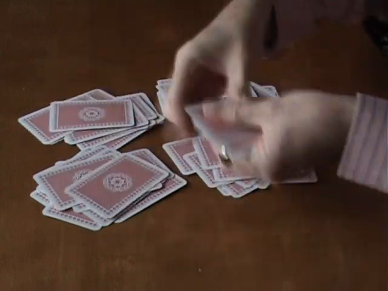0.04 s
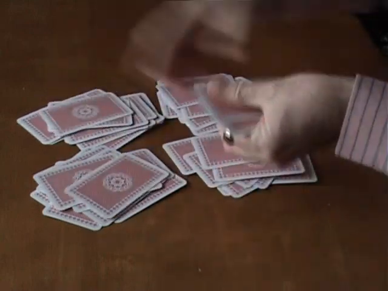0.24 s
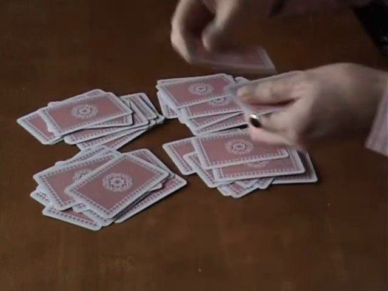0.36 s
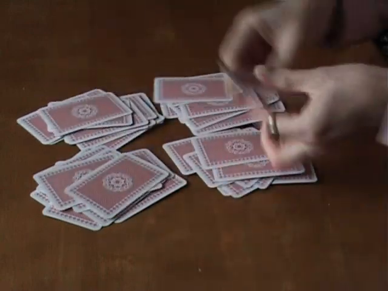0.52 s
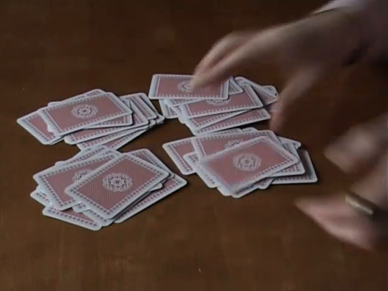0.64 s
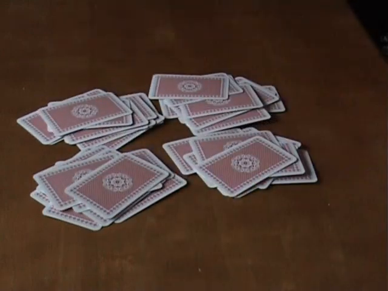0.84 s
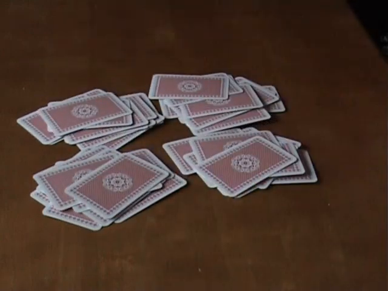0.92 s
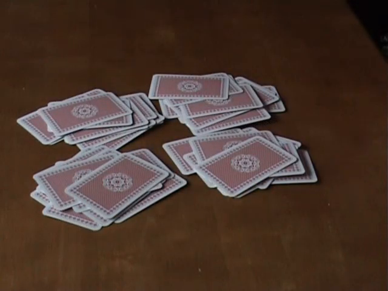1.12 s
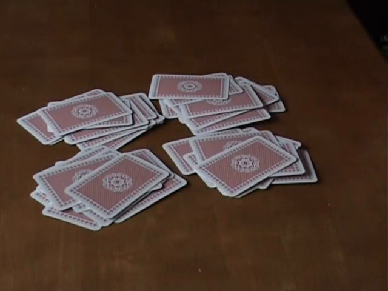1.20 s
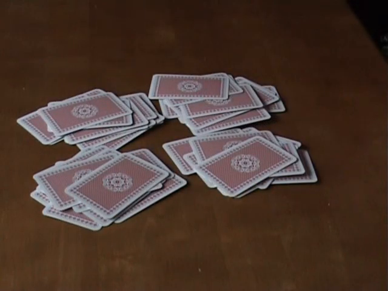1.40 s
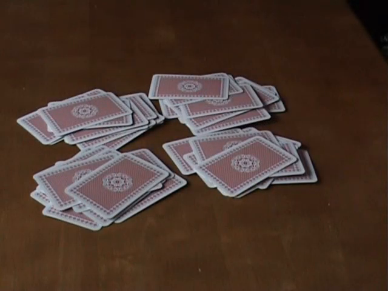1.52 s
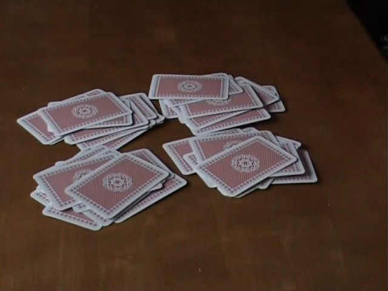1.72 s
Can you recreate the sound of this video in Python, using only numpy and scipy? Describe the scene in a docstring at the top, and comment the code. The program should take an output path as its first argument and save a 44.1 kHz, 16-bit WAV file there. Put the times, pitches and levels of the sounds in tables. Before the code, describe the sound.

Quick snaps and light clicks of playing cards dealt onto a wooden table.

```python
"""Dealing cards on a wooden table

The last playing cards are dealt onto piles, close by. Friction hisses as a card is rubbed off the pack;
bent, it snaps free of the thumb and rings in damped modes. Stiff edges click on the piles and the table
knocks softly. A small quiet room reflects these sounds, over a steady hiss, a faint hum, two low swells,
a few faint chirps and the whirr of a small motor."""
import sys
import numpy as np
from scipy import signal
from scipy.fft import rfft, irfft, next_fast_len
from scipy.io import wavfile
from scipy.ndimage import map_coordinates

SR = 44100
rng = np.random.default_rng(int(sys.argv[2]) if len(sys.argv) > 2 else 0)


def dump_mix(stems):
    """Bounce the given channels to the path in sys.argv[1] as a 16-bit WAV at rate SR."""
    frames = np.atleast_2d(stems).T  # one column per channel
    limited = np.clip(frames, -1, 1)  # hard clip at full scale
    pcm = np.round(limited * 32767).astype(np.int16)
    wavfile.write(sys.argv[1], SR, pcm)


N = 77175

# A bent card springs free: (time [s], level [dB], low mode [Hz], low mode relative level [dB],
# high mode [Hz], high mode t60 [s], edge crack relative level [dB])
SNAPS = [(0.248, 11.5, 755, -7, 2270, 0.0019, -12), (0.4975, 10, 1150, -4.5, 2990, 0.0048, -25.5)]
# Spectrum of the edge's crack in a snap: (frequency [Hz], gain [dB])
CRACK_SPECTRUM = [(300, -39), (700, -12), (2000, -22.5), (4300, 3.5), (6000, 2.5), (7800, -6.5),
                  (10000, -29), (14000, -27)]
# An edge strikes the pack or a pile: (time [s], level [dB], body shelf [dB], treble shelf [dB],
# clatter t60 [s], first contact against clatter [dB], modes as (frequency [Hz], relative level [dB]))
CLICKS = [(0.11, -12, -12, 0, 0.011, 3, []), (.1130, -17, -1, -3, 0.0074, -7, []),
          (0.191, -19.5, 2, 0, 0.013, -1, [(6100, -8)]), (0.3302, -15.5, 5, 3, 0.01, -18, []),
          (0.3471, -11.5, -11, 5.5, 0.0028, 15, [(3600, -10)]),
          (0.3501, -10, -23, -7, 0.0046, -7, [(6350, -6)]), (0.4294, -12.5, 2, 0, 0.003, -11, [(2110, 0)]),
          (0.4352, -11.5, 6.5, 5.5, 0.0053, 1.5, [(2030, -2.5)]),
          (0.5732, -3.5, -13.5, 6, 0.0046, -6, [(2550, -6.5), (5280, -1.5), (8500, -6)]),
          (0.582, -12, -13, 6, 0.013, -16, [(8300, -8)]), (0.65, -8.5, 7, -3, 0.0083, -11, [(2780, -7),
          (3600, -9), (6750, -9.5), (9750, -14)]), (0.7669, -18, -1, 8, 0.01, -9, [(2980, -5)]),
          (1.326, -26, -6, -11, 0.0043, -11, [(3700, 4)])]
# Spectrum of a struck edge: (frequency [Hz], gain [dB])
EDGE_SPECTRUM = [(100, -34), (350, -7.5), (900, 6), (1600, -7), (2200, -2.5), (2900, 2.5), (4300, -4),
                 (5500, -0.5), (9500, -1.5), (12000, -16.5), (15000, -25)]
# Card rubs on card:
# (start [s], duration [s], start level [dB], end level [dB], body shelf [dB], treble shelf [dB])
SLIDES = [(0, 0.0066, -35, -46, -14, -8), (0.013, 0.018, -50.5, -47, -21, -1),
          (0.192, 0.038, -44.5, -41, 1.5, 3), (0.232, 0.016, -43, -37, -14, -0.5),
          (0.319, 0.037, -44, -45, 4, 8), (0.427, 0.026, -41, -47, -1, 4.5),
          (0.442, 0.06, -47, -44, -7, -1), (0.495, 0.0021, -42, -36, 0, -16),
          (0.549, 0.015, -42, -46.5, 1, 2), (0.567, 0.026, -43.5, -45.5, -10, -4)]
# Friction noise: (frequency [Hz], relative spectral density [dB])
FRICTION_SPECTRUM = [(100, -15), (400, -0.5), (660, 2.5), (1050, 2.5), (2200, 2), (4200, -6.5),
                     (6200, -5.5), (10000, -9.5), (12500, -19.5), (15000, -29)]
# Hand and card knock the table through the pile: (time [s], level [dB], frequency [Hz], t60 [s])
KNOCKS = [(.111, -39, 297, 0.048), (0.2005, -32, 440, 0.045), (.205, -33.5, 840, 0.029),
          (.199, -34, 1080, .025), (.327, -41, 615, 0.05), (.305, -47, 350, 0.05), (.338, -46, 342, 0.05),
          (.4975, -35, 510, .035), (.571, -39, 270, 0.024), (.576, -36, 465, 0.023), (.651, -38, 575, 0.05),
          (.6505, -32, 921, 0.042), (0.6495, -33, 1200, 0.014)]
# Reflections from near surfaces: (delay [s], level [dB])
REFLECTIONS = [(.0012, -12.5), (.0056, -15.5), (0.013, -24), (0.015, -18.5), (0.0196, -19)]
# Reverberation time of the room: (frequency [Hz], t60 [s])
ROOM_T60 = [(200, 0.48), (2000, 0.14), (10000, 0.28)]
# Steady hiss: (frequency [Hz], relative spectral density [dB])
HISS_SPECTRUM = [(15, -13), (28, -12.5), (90, -8), (180, -5.5), (225, -7.5), (310, -2.5), (420, -11.5),
                 (740, -10.5), (900, -8), (1250, -11.5), (2000, -11), (2600, -14.5), (3600, -16),
                 (4700, -21), (7400, -19.5), (8800, -27), (10700, -22.5), (15000, -54)]
# Likeness of the room's noise at the two ears: (frequency [Hz], correlation [-1 to 1])
EAR_CORRELATION = [(35, 0.78), (70, 0.42), (170, 0.48), (370, 0), (1000, 0), (2400, 0.14), (6000, 0.0064),
                   (14000, 0)]
# Noise bands of the room's drone: (centre [Hz], width [Hz], level [dB])
DRONE_BANDS = [(273, 42, -69), (1005, 120, -62.5)]
# Steady tones of the room: (frequency [Hz], level [dB])
HUM_TONES = [(188.4, -72), (812.9, -66)]
# Low Gaussian swells: (peak time [s], standard deviation [s], centre [Hz], width [Hz], level [dB])
RUMBLES = [(0.062, .1, 40, 15, -60), (1.675, 0.14, 169, 62, -56.5)]
# The motor's noise: (frequency [Hz], relative spectral density [dB])
MOTOR_SPECTRUM = [(2000, -12), (3000, -5.5), (3700, 2), (4700, -4.5), (5500, 1), (6700, -5.5), (8500, -17),
                  (12000, -21)]
# Faint background chirps: (peak time [s], level [dB])
CHIRPS = [(.746, -52), (1.001, -52.5), (1.09, -55), (1.155, -51), (1.17, -51.5), (1.232, -52),
          (1.373, -52.5)]


def card_snaps():
    """Free vibration: a bent card, suddenly released, cracks and rings in three heavily damped modes."""
    low_mid_t60_s, mid_hz, mid_db = 0.0057, 1920, -11
    radiation = signal.butter(2, [610, 4600], "band", fs=SR, output="sos")  # band the card radiates [Hz]
    out, t = np.zeros(N), np.arange(SR // 20) / SR

    def mode(hz, t60):
        """Impulse response of a damped oscillator, with a gain near 1 at resonance."""
        return 2 * np.log(1000) / (t60 * SR) * decay(t, t60) * np.cos(2 * np.pi * hz * t)

    for time, db, low_hz, low_db, high_hz, high_t60, crack_db in SNAPS:
        ring = mode(high_hz, high_t60)
        ring += amp(mid_db) * mode(mid_hz, low_mid_t60_s)
        ring += amp(low_db) * mode(low_hz, low_mid_t60_s)
        add(out, time, amp(db) * signal.sosfilt(radiation, ring))
        crack = minimum_phase(lambda hz: amp(curve(CRACK_SPECTRUM, hz)))
        add(out, time, amp(db + crack_db) * crack)
    return out


def edge_clicks():
    """Impact excitation: a stiff edge strikes, clatters as it settles and may set card modes ringing."""
    ring_t60_s = 0.008
    out, t = np.zeros(N), np.arange(SR // 20) / SR
    for time, db, body_db, treble_db, clatter_t60, first_db, modes in CLICKS:
        contact = noise_burst(clatter_t60, rise_s=0.00031)
        contact[0] += amp(first_db)
        edge = minimum_phase(lambda hz: card_gain(EDGE_SPECTRUM, hz, body_db, treble_db))
        click = signal.fftconvolve(unit_energy(contact), edge)
        add(out, time, amp(db) * click)
        for ring_hz, ring_db in modes:
            ring = unit_energy(decay(t, ring_t60_s) * np.sin(2 * np.pi * ring_hz * t))
            add(out, time, amp(db + ring_db) * np.linalg.norm(click) * ring)
    return out


def card_slides():
    """Sliding friction: card on card gives smooth noise, with tiny impulses where the finish catches."""
    attack_s, release_s = 0.0063, 0.0054
    catches_per_s, catch_db = 1500, -0.5
    out, t = np.zeros(N), np.arange(N) / SR
    for start, duration, start_db, end_db, body_db, treble_db in SLIDES:
        end = start + duration
        catches = rng.standard_normal(N) * (rng.random(N) < catches_per_s / SR)
        friction = rng.standard_normal(N) + amp(catch_db) * unit_rms(catches)
        rub = filtered(friction, lambda hz: card_gain(FRICTION_SPECTRUM, hz, body_db, treble_db))
        attack = np.clip((t - start) / attack_s, 0, 1)
        release = np.exp(-np.maximum(t - end, 0) / release_s)
        level = amp(np.interp(t, [start, end], [start_db, end_db]))
        out += level * attack * release * unit_rms(rub)
    return out


def table_knocks():
    """Damped resonance: each soft blow through the pile leaves one short, low ring of the table."""
    attack_s = 0.0013
    out, t = np.zeros(N), np.arange(SR // 5) / SR
    attack = 1 - np.exp(-t / attack_s)
    for time, db, hz, t60 in KNOCKS:
        add(out, time, amp(db) * attack * decay(t, t60) * np.sin(2 * np.pi * hz * t))
    return out


def room_reverberation(direct):
    """Convolution with the room's response: blurred early reflections and a short tail for each ear."""
    blur_t60_s, early_cutoff_hz = 0.01, 3020
    tail_db, tail_cutoff_hz = -9.5, 6000
    band_hz, t, noise = signal.stft(rng.standard_normal((2, SR // 3)), SR, nperseg=256)
    _, tail = signal.istft(noise * decay(t, curve(ROOM_T60, band_hz)[:, None]), SR, nperseg=256)
    tail /= np.linalg.norm(tail[0])
    early = np.zeros((2, N))
    for delay, db in REFLECTIONS:
        shared = noise_burst(blur_t60_s)
        for ear in early:
            add(ear, delay, amp(db) * (shared + 0.5 * noise_burst(blur_t60_s)))
    response = filtered(early, lambda hz: 1 / np.hypot(1, hz / early_cutoff_hz))
    response += amp(tail_db) * filtered(tail, lambda hz: 1 / np.hypot(1, hz / tail_cutoff_hz))
    return signal.fftconvolve(direct[None], response, axes=1)[:, :N]


def room_ambience():
    """Superposition: broadband hiss, narrowband drone, a slightly wavering hum and two low swells."""
    hiss_db = -51.5
    waver_per_s, waver_db, drift_rad = 13.9, 0.6, 0.15
    t = np.arange(N) / SR
    out = amp(hiss_db) * stereo_noise(lambda hz: amp(curve(HISS_SPECTRUM, hz)))
    for hz, width, db in DRONE_BANDS:
        out += amp(db) * noise_band(hz, width)
    for hz, db in HUM_TONES:
        amplitude = np.sqrt(2) * amp(db + waver_db * wander(waver_per_s, points=200))
        phase = 2 * np.pi * hz * t + drift_rad * wander(waver_per_s, points=200)
        out += amplitude * np.sin(phase)
    for time, sigma_s, hz, width, db in RUMBLES:
        out += amp(db) * swell(time, sigma_s) * noise_band(hz, width)
    return out


def faint_chirps():
    """Random phase modulation roughens a tone that is heard only in brief, faint blips."""
    pitch_hz, sigma_s, roughness_rad = 2120, 0.0045, 0.8
    t = np.arange(N) / SR
    phase = 2 * np.pi * pitch_hz * t + roughness_rad * wander(per_s=400, points=N)
    envelope = sum(amp(db) * swell(time, sigma_s) for time, db in CHIRPS)
    return envelope * np.sin(phase)


def motor_whirr():
    """Amplitude modulation: a small motor gives one puff of noise per turn as its speed drifts."""
    level_db, turns_per_s, drift_fraction, puff_depth = -57.5, 301.7, 0.0216, 0.66
    speed = turns_per_s * (1 + drift_fraction * wander(per_s=10, points=40))
    turns = np.cumsum(speed) / SR
    puffs = rng.standard_normal(N) * np.exp(puff_depth * np.cos(2 * np.pi * turns))
    return amp(level_db) * unit_rms(filtered(puffs, lambda hz: amp(curve(MOTOR_SPECTRUM, hz))))


def card_gain(spectrum, hz, body_db, treble_db):
    """Shelving: a card's spectrum is raised or lowered in its body and in its treble."""
    body_hz, treble_hz = 1930, 7400
    body = 1 / (1 + (hz / body_hz) ** 4)
    treble = 1 - 1 / (1 + (hz / treble_hz) ** 4)
    return amp(curve(spectrum, hz) + body_db * body + treble_db * treble)


def stereo_noise(gain):
    """Partial coherence: the ratio of mid to side sets how alike the ears are in noise of rms 1."""
    def mid_side_gain(hz):
        angle = np.arccos(np.clip(curve(EAR_CORRELATION, hz), -1, 1)) / 2
        return gain(hz) * [np.cos(angle), np.sin(angle)]

    mid, side = filtered(rng.standard_normal((2, N)), mid_side_gain)
    return unit_rms(np.array([mid + side, mid - side]))


def noise_band(centre_hz, width_hz):
    """Band-pass filtering confines stereo noise to one narrow peak."""
    return stereo_noise(lambda hz: 1 / (1 + (2 * (hz - centre_hz) / width_hz) ** 2))


def noise_burst(t60, rise_s=1e-5):
    """Exponentially damped noise of energy 1."""
    t = np.arange(1024) / SR
    return unit_energy(rng.standard_normal(len(t)) * decay(t, t60) * (1 - np.exp(-t / rise_s)))


def wander(per_s, points):
    """Spline interpolation turns random points into a smooth fluctuation."""
    return map_coordinates(rng.standard_normal(points), [np.arange(N) / SR * per_s])


def swell(time, sigma_s):
    """Gaussian envelope with a peak of 1 at the given time."""
    return np.exp(-((np.arange(N) / SR - time) / sigma_s) ** 2 / 2)


def decay(t, t60):
    """Exponential damping: 60 dB in t60 seconds."""
    return amp(-60 * t / t60)


def minimum_phase(gain, size=2048):
    """Folding the cepstrum gives the most compact causal impulse response with this gain."""
    cepstrum = irfft(np.log(gain(np.fft.rfftfreq(size, 1 / SR)) + 1e-6))
    cepstrum[1:size // 2] *= 2
    cepstrum[size // 2 + 1:] = 0
    return irfft(np.exp(rfft(cepstrum)))


def filtered(x, response):
    """Linear filtering: the spectrum of x is multiplied by a frequency response."""
    size = next_fast_len(N + SR // 4)
    return irfft(rfft(x, size) * response(np.fft.rfftfreq(size, 1 / SR)), size)[..., :N]


def curve(points, hz):
    """Interpolation of (frequency [Hz], value) points on a logarithmic frequency axis."""
    frequencies, values = np.transpose(points)
    return np.interp(np.log(hz + 1), np.log(frequencies + 1), values)


def amp(db):
    """Amplitude ratio of a level in decibels."""
    return 10 ** (np.asarray(db) / 20)


def unit_rms(x):
    """Normalisation to rms 1."""
    return x / np.sqrt(np.mean(x ** 2) + 1e-20)


def unit_energy(x):
    """Normalisation to energy 1."""
    return x / np.linalg.norm(x)


def add(track, time, x):
    """Superposition of x on the track, from a time in seconds."""
    start = max(round(time * SR), 0)
    track[start:start + len(x)] += x[:N - start]


def pan(x, right_db):
    """Interaural level difference: the right ear leads the left by right_db."""
    return x * amp([[-right_db / 2], [right_db / 2]])


def treble_spread(x):
    """Antiphase: delayed treble of opposite sign at each ear widens the cards' sound."""
    level_db, cutoff_hz, lag_s = -11.5, 8500, 0.000377
    highpass = lambda hz: hz ** 2 / np.hypot(hz ** 2, cutoff_hz ** 2)
    side = amp(level_db) * filtered(x, lambda hz: highpass(hz) * np.exp(-2j * np.pi * hz * lag_s))
    return np.array([side, -side])


def scene():
    """Direct and reverberant fields add: the piles near the centre, the hand a little to the right."""
    hand = card_snaps()
    table = edge_clicks() + card_slides() + table_knocks()
    direct = pan(hand, right_db=2) + pan(table, right_db=0.7) + treble_spread(table)
    return direct + room_reverberation(hand + table) + room_ambience() + faint_chirps() + motor_whirr()


def record(dry):
    """Band limiting: the top treble rolls off steeply and nothing passes above the limit."""
    roll_off_hz, limit_hz = 13900, 15200
    return filtered(dry, lambda hz: (hz < limit_hz) / np.hypot(1, (hz / roll_off_hz) ** 20))


dry = scene()
out = record(dry)
dump_mix(out)
```